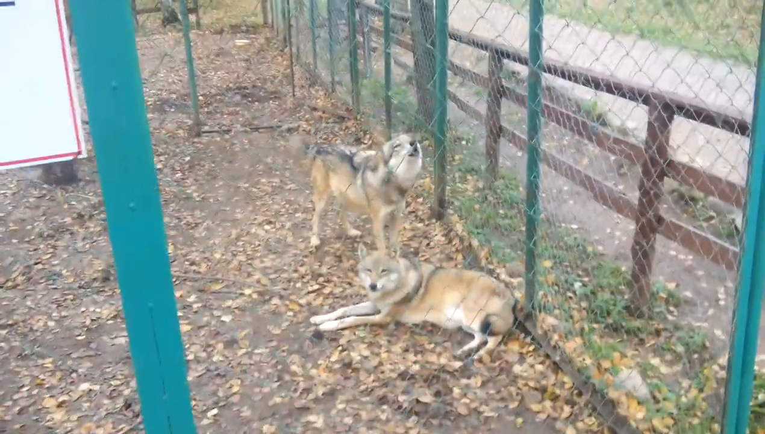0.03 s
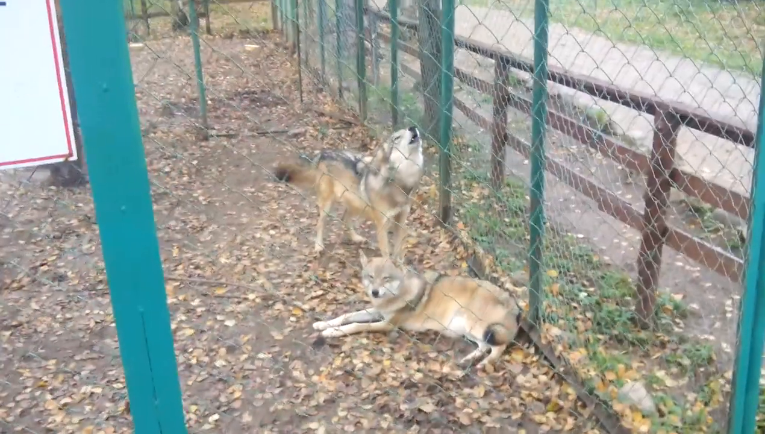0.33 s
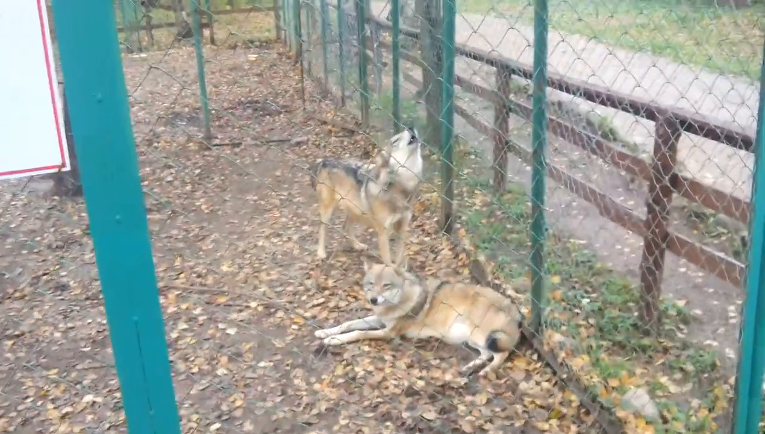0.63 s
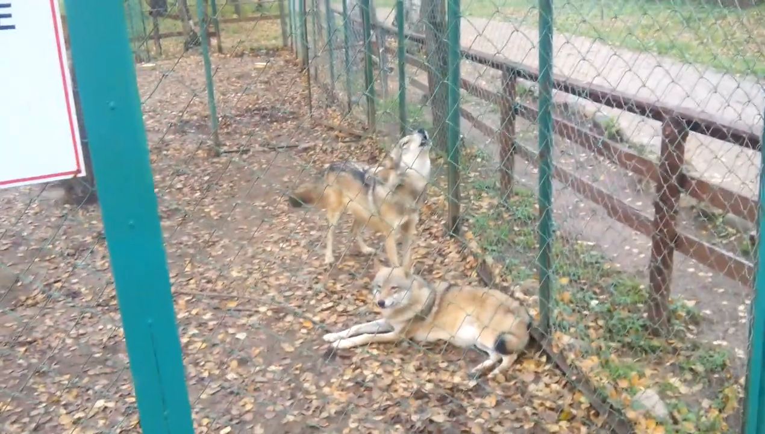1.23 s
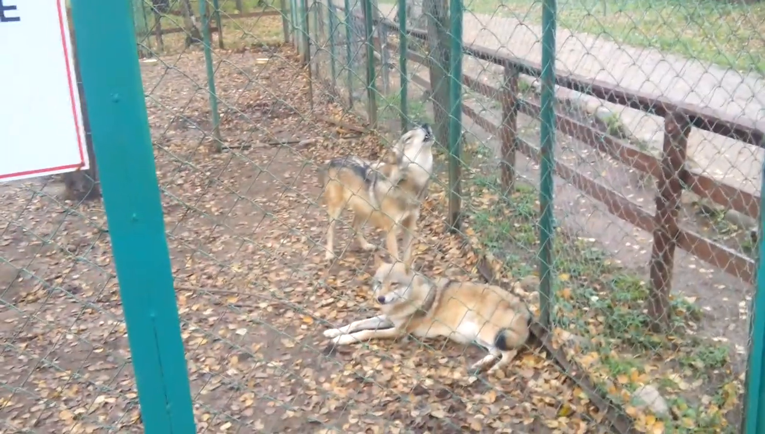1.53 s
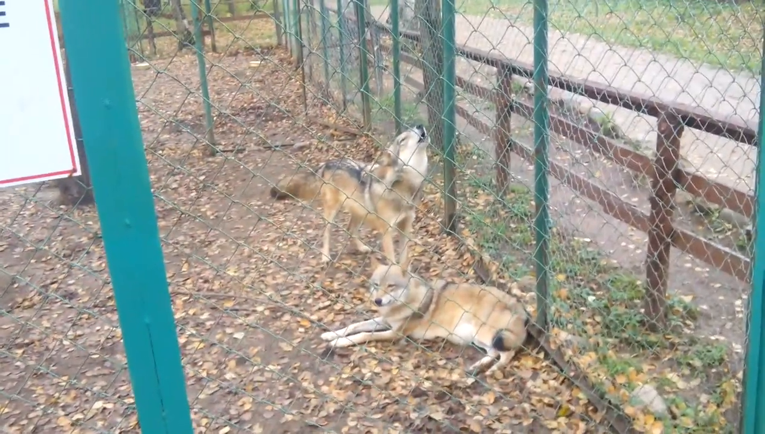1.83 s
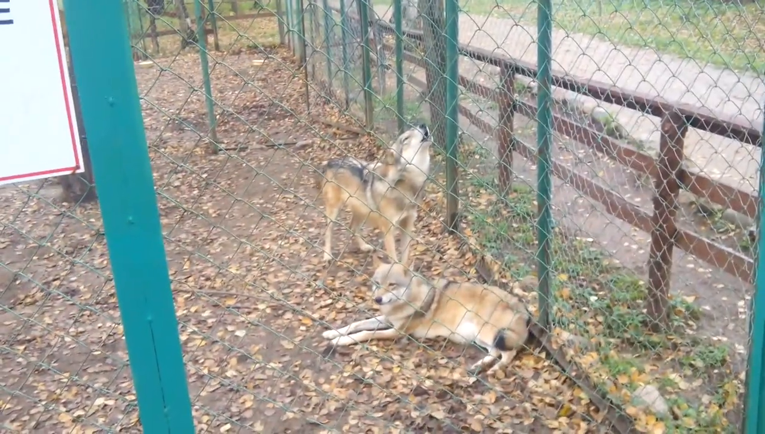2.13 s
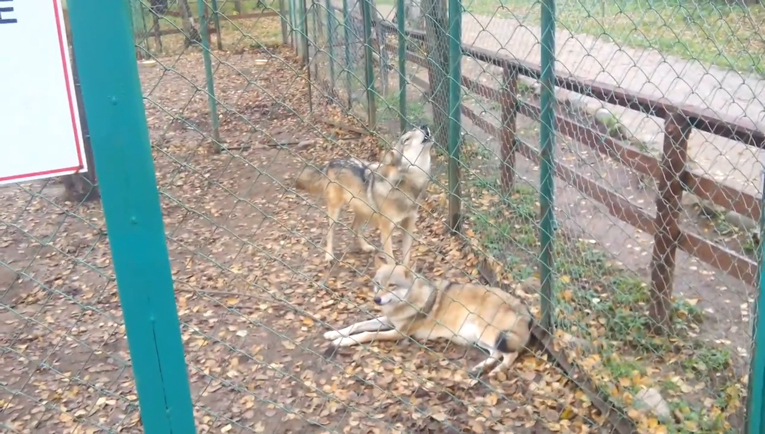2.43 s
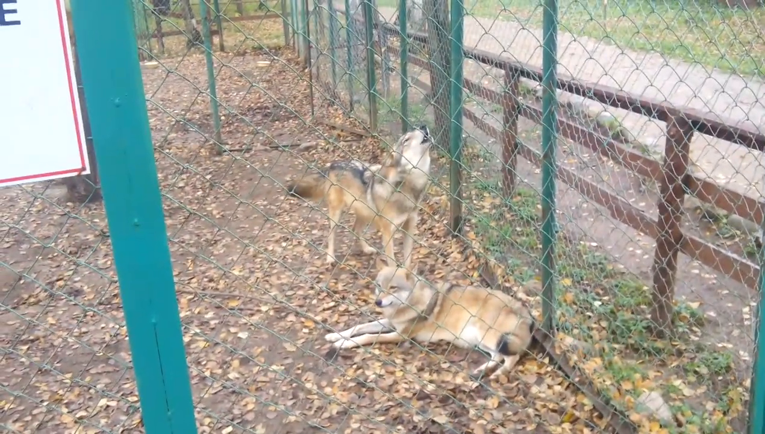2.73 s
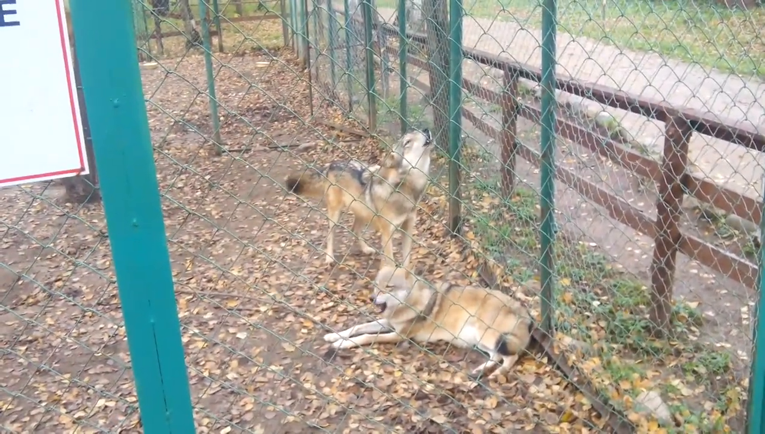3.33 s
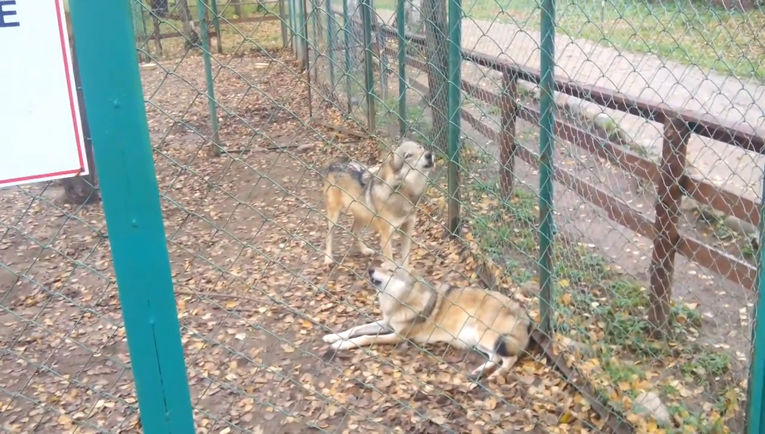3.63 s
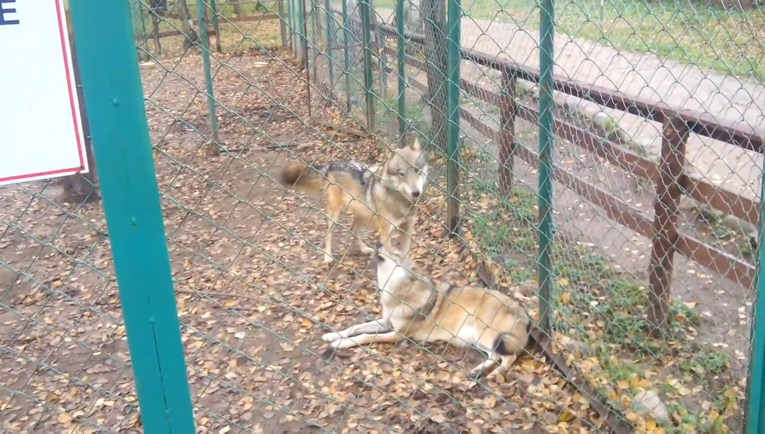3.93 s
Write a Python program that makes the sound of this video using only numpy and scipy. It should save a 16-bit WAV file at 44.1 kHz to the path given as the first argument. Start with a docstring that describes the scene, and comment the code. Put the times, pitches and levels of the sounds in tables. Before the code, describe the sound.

A wolf gives one long howl outdoors, with faint crackles of dry leaves.

```python
"""An outdoor pen strewn with leaves, where a wolf gives one long howl: a low moan slides up to a held
note, lifts, settles and sinks away. The vocal folds make the harmonics and the throat shapes them; the
highest now and then ring as a thin whistle. Dry leaves crackle under paws, the fence takes one light
knock, and fence and trees scatter a faint echo. Behind it all lie a steady outdoor rush, a low hum
and a far engine that picks up speed."""
import sys
import numpy as np
from scipy import signal
from scipy.fft import rfft, irfft, next_fast_len
from scipy.io import wavfile
from scipy.ndimage import uniform_filter1d, map_coordinates

SR = 44100
rng = np.random.default_rng(int(sys.argv[2]) if len(sys.argv) > 2 else 0)


def transcribe(signal):
    """Save signal, clipped to [-1, 1], as a 16-bit WAV file at the path in sys.argv[1]."""
    frames = np.atleast_2d(signal).T
    limited = np.clip(frames, -1, 1)
    pcm = np.round(limited * 32767).astype(np.int16)
    wavfile.write(sys.argv[1], SR, pcm)


N = 176400  # 4 s

# the howl's melody (time [s], pitch [Hz])
HOWL_PITCH = [(0.02, 141.9), (0.09, 147.6), (0.125, 143.8), (0.15, 132.5), (0.21, 128.6), (0.27, 134.8),
              (0.32, 139.3), (0.35, 183), (0.38, 201.5), (0.42, 234), (0.5, 244.8), (0.7, 260.8),
              (0.84, 273.6), (0.9, 291.2), (1.08, 298.7), (1.22, 300.8), (1.35, 295), (1.47, 291.2),
              (1.54, 265.6), (1.63, 251.5), (1.76, 247.2), (1.84, 258), (1.93, 250), (2.05, 252.3),
              (2.17, 254.3), (2.28, 249.6), (2.36, 252.6), (2.45, 267), (2.6, 257.8), (2.79, 250.8),
              (2.88, 255.8), (3.0, 256), (3.15, 247), (3.28, 253.5), (3.38, 250.8), (3.5, 238.6),
              (3.63, 230.5), (3.71, 216.8), (3.77, 184), (3.84, 161.8), (3.92, 150.8), (4.0, 129)]

def vocal_pitch(jitter=.0027):
    """The rate of the vocal folds in Hz: the melody with a fast, slight unsteadiness."""
    return curve(HOWL_PITCH) * (1 + jitter * wobble(90))


# formants of the throat (frequency [Hz], gain [dB])
THROAT_EQ = [(130, -15.5), (250, -13.5), (330, 24), (400, -1), (455, -17), (520, 3.5), (600, -3),
             (680, -12.5), (790, 1.5), (900, -9.5), (1000, -27.5), (1200, -36)]
# the voice's low, middle and upper register (from [Hz], to [Hz])
REGISTER_BANDS = [(215, 435), (435, 640), (640, 960)]
# fader rides for the three registers (time [s], level before trim [dB])
LOW_RIDE = [(0.0, -61.3), (0.15, -56), (0.3, -51.5), (0.355, -41), (0.4, -50), (0.44, -53.5), (0.6, -43.5),
            (0.7, -46), (0.78, -36.5), (0.9, -33.1), (1.08, -28), (1.47, -30.8), (1.57, -45), (1.8, -43.6),
            (2.15, -39.0), (2.5, -39.8), (2.9, -39), (3.2, -44.5), (3.42, -39), (3.5, -53), (3.68, -58.6),
            (3.75, -39.5), (3.84, -30), (3.91, -34), (3.95, -53), (4.0, -45.6)]
MIDDLE_RIDE = [(0.0, -68), (0.03, -71), (0.09, -44.5), (0.31, -34), (0.33, -49), (0.36, -31), (0.39, -50),
               (0.52, -32.5), (0.61, -27.5), (0.73, -24), (0.79, -25), (0.88, -37), (1.0, -43.5),
               (1.24, -43.5), (1.36, -37), (1.43, -41.5), (1.48, -37), (1.53, -26), (1.55, -25),
               (1.68, -34.5), (1.76, -35), (1.84, -26.5), (1.94, -32), (2.19, -28), (2.27, -33),
               (2.46, -21), (2.82, -30.5), (2.92, -26), (3.03, -28), (3.17, -38), (3.21, -38), (3.29, -31),
               (3.39, -35.5), (3.41, -41.5), (3.62, -47), (3.65, -72), (3.71, -54), (3.78, -34),
               (3.84, -61), (3.91, -38), (3.97, -41.5), (4.0, -52)]
UPPER_RIDE = [(0.0, -64), (0.27, -53.5), (0.34, -75), (0.39, -39), (0.41, -53), (0.69, -36), (0.87, -37.5),
              (0.9, -42), (1.1, -47.5), (1.37, -43), (1.49, -49.5), (1.55, -31), (1.7, -50), (1.73, -42.5),
              (1.8, -45.5), (1.83, -34), (1.85, -34), (1.96, -46), (2.19, -34), (2.32, -45.5), (2.42, -28),
              (2.47, -32), (2.55, -28.5), (2.68, -32.5), (2.81, -42), (2.93, -33), (3.01, -34), (3.1, -40),
              (3.22, -33.5), (3.27, -42.5), (3.5, -37), (3.78, -56), (3.82, -50), (4.0, -60)]
# one trim per register (gain [dB])
REGISTER_TRIMS = [0.05, -0.87, -1]

def howl(pitch, creak_below_hz=165, creak_db=1.2, shimmer_db=.45):
    """Seven harmonics of the vocal folds, shaped by the throat; each register has its own level."""
    harmonic = np.arange(1, 8)[:, None]
    hz = harmonic * pitch
    partials = np.sqrt(2) * np.sin(harmonic * phase_of(pitch) + rng.uniform(0, 2 * np.pi, (7, 1)))
    creak = 1 / (1 + (pitch / creak_below_hz) ** 12)  # the folds flutter where the pitch is low
    partials *= amp(creak_db * creak * np.array([wobble(110) for _ in harmonic]))
    throat = eq_gain(THROAT_EQ, hz)
    rides = LOW_RIDE, MIDDLE_RIDE, UPPER_RIDE
    voice = np.zeros(N)
    for (lo, hi), ride, trim_db in zip(REGISTER_BANDS, rides, REGISTER_TRIMS):
        share = throat / (1 + (lo / hz) ** 24 + (hz / hi) ** 24)
        share /= np.sqrt(np.sum(share ** 2, axis=0) + 1e-4)  # even out the power before the fader
        voice += amp(trim_db) * fader(ride, shimmer_db, 75) * np.sum(share * partials, axis=0)
    return voice


# overtones ringing out (start [s], length [s], centre [Hz], half-width [Hz], level before trim [dB])
WHISTLE_CUES = [(1.849, 0.13, 5620, 90, -62.5), (1.91, 0.46, 5563, 109.4, -62.5),
                (2.06, 0.17, 5500, 90, -60), (2.32, 0.11, 5540, 99.8, -56), (2.42, 0.12, 5630, 100.6, -58),
                (2.48, .16, 4810, 127, -59.5), (2.604, .12, 5100, 100.3, -64),
                (2.661, .12, 5460, 90, -59.5), (2.823, 0.26, 4995, 131, -60.5),
                (2.852, .21, 6830, 89.7, -60), (3.088, 0.17, 5010, 110, -61.5),
                (3.102, 0.17, 5650, 420, -61), (3.384, .1, 4950, 110, -64)]

def whistle(pitch, trim_db=-1.5, flutter_db=1.5):
    """High harmonics of the howl swell and flutter while they pass through a narrow resonance."""
    harmonic = np.arange(16, 31)[:, None]
    phase = phase_of(pitch)
    swells = np.zeros(N)
    for start, length, centre, half_width, db in WHISTLE_CUES:
        span = np.arange(int(start * SR), min(N, int((start + length) * SR)))
        resonance = 1 / (1 + ((harmonic * pitch[span] - centre) / half_width) ** 4)
        ring = np.sum(resonance * np.sin(harmonic * phase[span]), axis=0)
        swells[span] += amp(db) * unit(ring * signal.windows.tukey(len(span), .7))
    return swells * amp(trim_db + flutter_db * wobble(54))


# leaves crushed under a paw (time [s], level [dB], decay t60 [s], attack [s])
CRUNCH_CUES = [(.918, -38, .09, .01), (.935, -33, .03, .002), (.946, -49, .22, .01),
               (1.019, -41, .03, .003), (1.042, -34, .025, .002), (1.06, -54, .5, .02),
               (1.857, -52, .06, .005), (2.276, -45, .2, .02), (2.305, -36, .035, .003),
               (3.223, -48, .02, .002)]
# the crunch's crisp tone (frequency [Hz], gain [dB])
CRUNCH_EQ = [(1500, -27), (3000, -24), (4700, -26.5), (5600, -14), (6200, -3.5), (6900, 0.5), (8000, -11),
             (9800, -22), (11000, -14.5), (12200, -28), (15500, -36)]
# small snaps of dry leaf edges (time [s], level [dB], decay t60 [s], attack [s])
SNAP_CUES = [(.505, -50, 0.025, 0.0018), (.4, -56, 0.94, 0.12), (1.11, -57, .12, .01),
             (1.273, -53, .025, .002), (1.353, -51.5, .025, 0.0016), (1.394, -45, .012, .001),
             (1.612, -51.5, .2, .025), (1.785, -58, .15, .02)]
# the snap's brittle top end (frequency [Hz], gain [dB])
SNAP_EQ = [(3000, -28), (7000, -4), (9500, -11.5), (11000, -3), (12200, -14.5), (15500, -15.5)]

def leaves(cues, eq, crackle_db=5):
    """Dry leaves breaking: grainy noise jumps up at each contact and dies away."""
    power = np.zeros(N)
    for start, db, t60, attack in cues:
        age = age_since(start)
        power += (amp(db) * decay(age, t60) * (1 - np.exp(-age / attack))) ** 2
    grains = rng.standard_normal(N) * amp(crackle_db * wobble(570))
    return np.sqrt(power) * unit(filtered(grains, lambda hz: eq_gain(eq, hz)))


# modes of the fence (frequency [Hz], level [dB], decay t60 [s])
FENCE_MODES = [(1530, -46, .025), (1930, -35, .04)]

def fence_knock(start_s=3.383):
    """A light knock on the fence: two damped modes give one short, dull ring."""
    age = age_since(start_s)
    return sum(amp(db) * decay(age, t60) * np.sin(2 * np.pi * hz * age) for hz, db, t60 in FENCE_MODES)


def echo(sound, t60_s=.5):
    """Fence and trees scatter the sound into a diffuse, fading tail."""
    age = np.arange(SR // 2) / SR
    tail = rng.standard_normal(len(age)) * decay(age, t60_s)
    return signal.fftconvolve(sound, tail / np.linalg.norm(tail))[:N]


# tone of each layer of the outdoor bed (frequency [Hz], gain [dB])
RUMBLE_EQ = [(25, -17.5), (40, -11.5), (60, -9.5), (85, -2.5), (120, -1), (190, -3), (320, -10.5),
             (600, -10), (1000, -12), (1400, -26), (2500, -48)]
AIR_EQ = [(300, -24), (700, -5.5), (950, -5), (1150, -6), (1400, -5), (1800, -9), (2100, -11), (2500, -17),
          (3100, -15.5), (3700, -19), (4300, -25.5), (6000, -41.5)]
RASP_EQ = [(1000, -27), (1400, -14), (1550, -1), (1680, -4), (1880, 0), (2020, -4), (2200, -19.5),
           (2600, -27.5), (3100, -15), (3600, -27), (5000, -48)]
HISS_EQ = [(3000, -27), (4200, -3.5), (5200, 1), (6300, 5.5), (7000, 6.5), (7700, -9), (9500, -16.5),
           (11500, -22), (12600, -14.5), (14000, -38), (15700, -33.5)]
# fader rides for those layers (time [s], level [dB])
RUMBLE_RIDE = [(0, -47.5), (.6, -46.5), (1.15, -44), (1.6, -48), (2.6, -44.5), (3.15, -46), (3.5, -50),
               (4, -50.5)]
AIR_RIDE = [(0, -51), (.4, -54.5), (1, -52.5), (1.5, -55.5), (2.1, -55), (2.27, -53), (2.4, -53.5),
            (3.1, -54), (3.5, -54), (4, -54.5)]
RASP_RIDE = [(0, -57.5), (.3, -56), (.5, -58), (.72, -52), (.83, -57.5), (.95, -51), (1.1, -60.5),
             (1.6, -56), (1.8, -56.5), (2.05, -60.5), (2.45, -54), (2.7, -56), (2.9, -56.5), (3.2, -57.5),
             (3.45, -50.5), (3.7, -53.5), (4, -53.5)]
HISS_RIDE = [(0, -58), (.5, -59.5), (.64, -54), (.76, -61), (1.15, -57), (1.5, -60), (2.2, -59),
             (2.55, -58), (2.8, -60), (3.2, -58.5), (3.33, -60.5), (3.48, -55.5), (3.58, -59.5),
             (3.68, -55), (3.8, -61.5), (4, -61)]

def outdoor_rush():
    """A noise bed of low rumble, airy mids, a rasp near 1.8 kHz and high hiss, each drifting a little."""
    rumble = fader(RUMBLE_RIDE, drift_db=1.5, per_s=9) * noise(RUMBLE_EQ)
    air = fader(AIR_RIDE, drift_db=1.3, per_s=12) * noise(AIR_EQ)
    rasp = fader(RASP_RIDE, drift_db=2.6, per_s=25.18) * noise(RASP_EQ)
    hiss = fader(HISS_RIDE, drift_db=1.3, per_s=30) * noise(HISS_EQ)
    return rumble + air + rasp + hiss


# fader ride for the hum's fundamental (time [s], level [dB])
HUM_RIDE = [(0, -51), (.6, -54), (1.3, -61.5), (2.4, -61), (3, -63), (4, -63)]

def hum(pitch_hz=59.8, octave_db=-4.5):
    """A low machine hum and its octave, wavering in pitch and level."""
    phase = phase_of(pitch_hz * (1 + .014 * wobble(6.5)))
    tone = np.sqrt(2) * (np.sin(phase) + amp(octave_db) * np.sin(2 * phase))
    return fader(HUM_RIDE, drift_db=1.8, per_s=10) * tone


# the engine revving up (time [s], firing rate [Hz], level [dB])
ENGINE_REV = [(0, 58, -67), (2.1, 61, -64), (2.3, 64.3, -52), (3, 71.8, -58), (3.25, 78.8, -56),
              (3.5, 85.3, -50), (4, 94.6, -55)]

def far_engine():
    """A far engine gains speed: one low tone climbs with its firing rate."""
    gain = amp(curve(ENGINE_REV, column=2) + wobble(9.7))
    return gain * np.sqrt(2) * np.sin(phase_of(curve(ENGINE_REV)))


def amp(db):
    """Decibels to gain."""
    return 10 ** (np.asarray(db) / 20)


def unit(x):
    """Scale to rms 1."""
    return x / np.sqrt(np.mean(x ** 2) + 1e-20)


def eq_gain(eq, hz):
    """Linear gain of an EQ curve, read on a log frequency axis."""
    freqs, db = np.transpose(eq)
    return amp(np.interp(np.log(hz + 1), np.log(freqs + 1), db))


def curve(rows, column=1):
    """One column of a timed table, per sample, with rounded corners."""
    columns = np.transpose(rows)
    return uniform_filter1d(np.interp(np.arange(N) / SR, columns[0], columns[column]), size=700)


def wobble(per_s):
    """A smooth random curve with per_s knots a second."""
    return map_coordinates(rng.standard_normal(4096), [np.arange(N) * per_s / SR], mode="mirror")


def fader(ride, drift_db, per_s):
    """Gain that follows a level ride and drifts randomly around it."""
    return amp(curve(ride) + drift_db * wobble(per_s))


def filtered(x, response):
    """Filter x by a gain that depends on frequency."""
    size = next_fast_len(N + SR // 2)
    return irfft(rfft(x, size) * response(np.fft.rfftfreq(size, 1 / SR)), size)[:N]


def noise(eq):
    """Coloured noise of rms 1."""
    return unit(filtered(rng.standard_normal(N), lambda hz: eq_gain(eq, hz)))


def phase_of(hz):
    """Running phase of a frequency curve."""
    return 2 * np.pi * np.cumsum(hz) / SR


def age_since(start):
    """Seconds since a cue, held between 0 and 1."""
    return np.clip(np.arange(N) / SR - start, 0, 1)


def decay(age, t60):
    """An envelope that falls 60 dB in t60 seconds."""
    return np.exp(-np.log(1000) * age / t60)


def scene(echo_db=-29):
    """Mono mix: wolf, leaves and knock up front with their echo, over the rush, hum and engine."""
    pitch = vocal_pitch()
    wolf = howl(pitch) + whistle(pitch)
    paws = leaves(CRUNCH_CUES, CRUNCH_EQ) + leaves(SNAP_CUES, SNAP_EQ)
    near = wolf + paws + fence_knock()
    return (near + amp(echo_db) * echo(near) + outdoor_rush() + hum() + far_engine())[None]


def record(dry, cutoff_hz=15750):
    """A brick-wall high cut on the whole mix."""
    return filtered(dry[0], lambda hz: 1 / (1 + (hz / cutoff_hz) ** 400))[None]


dry = scene()
out = record(dry)
transcribe(out)
```